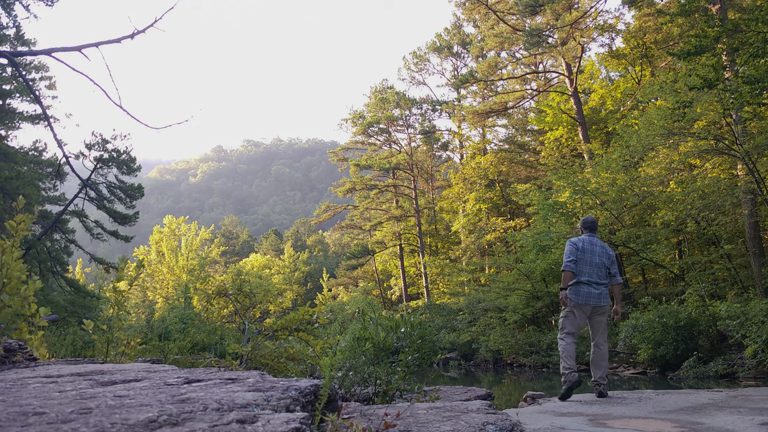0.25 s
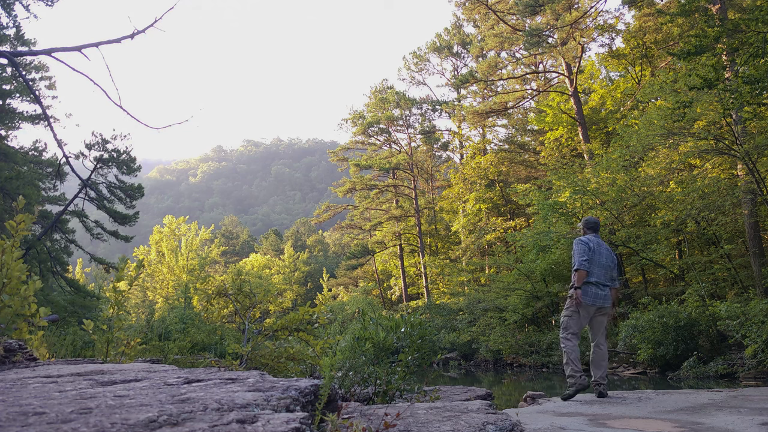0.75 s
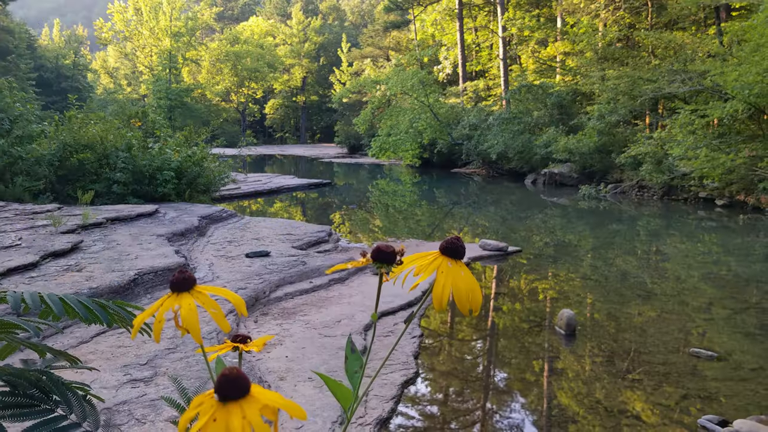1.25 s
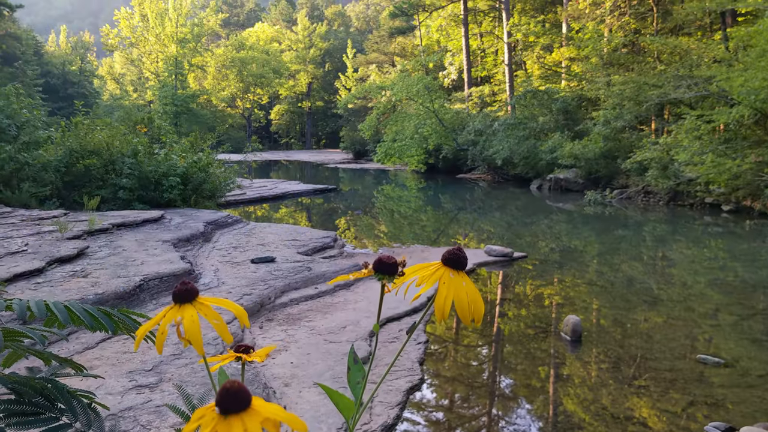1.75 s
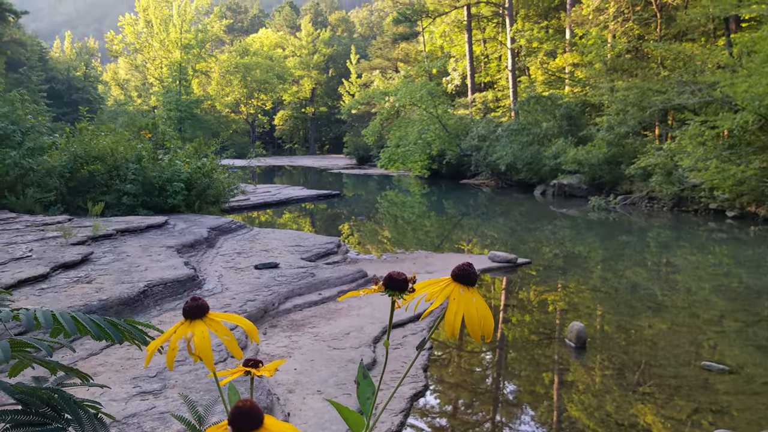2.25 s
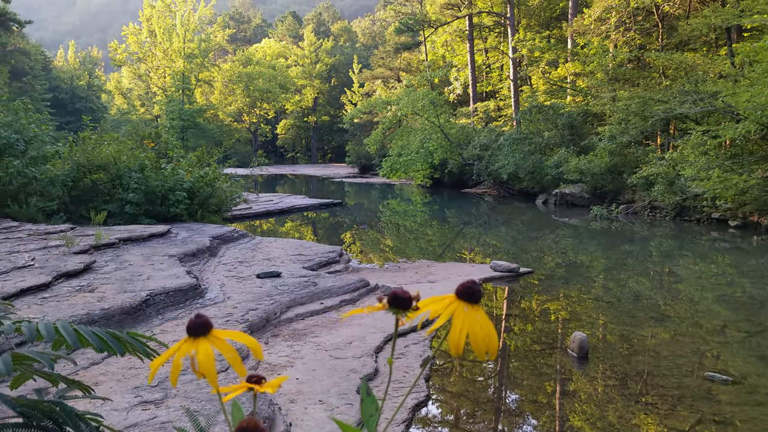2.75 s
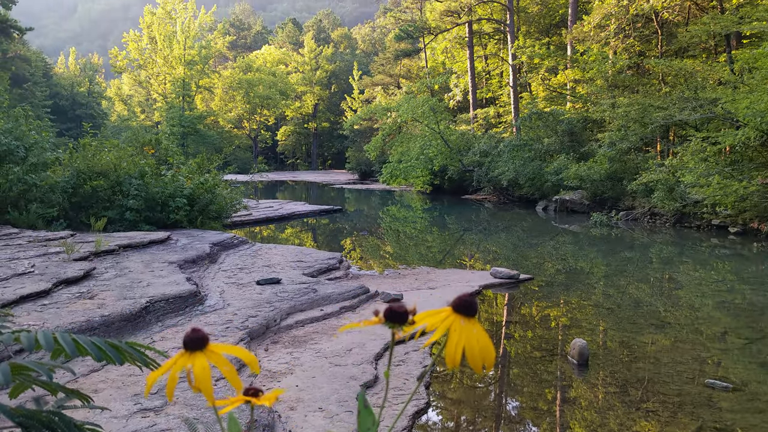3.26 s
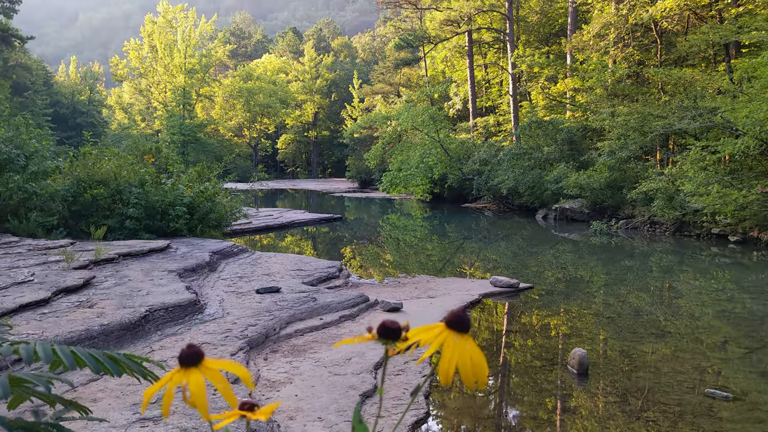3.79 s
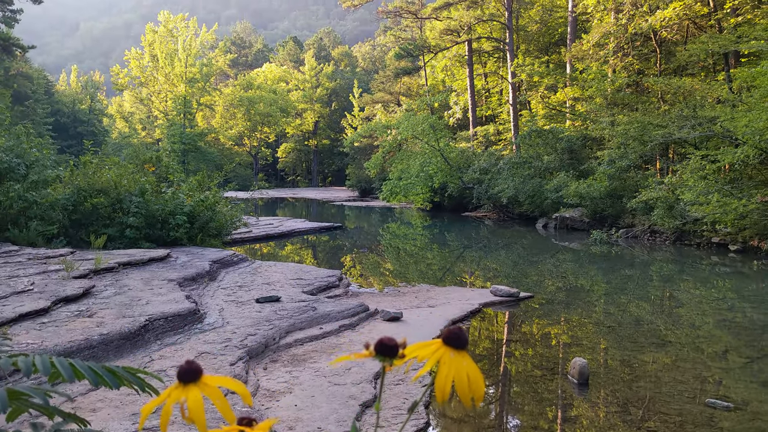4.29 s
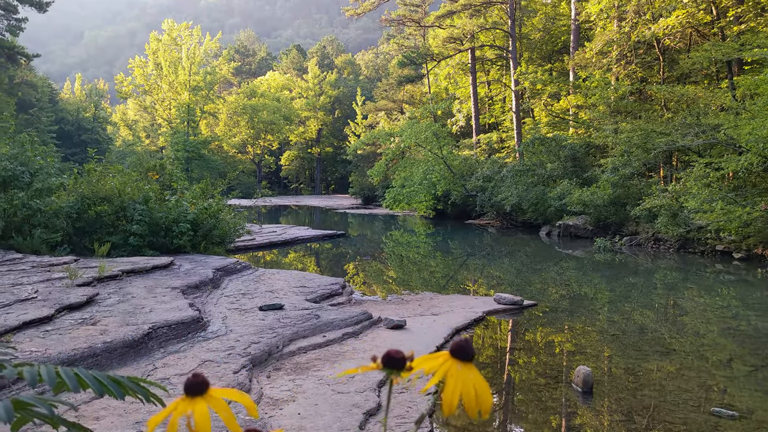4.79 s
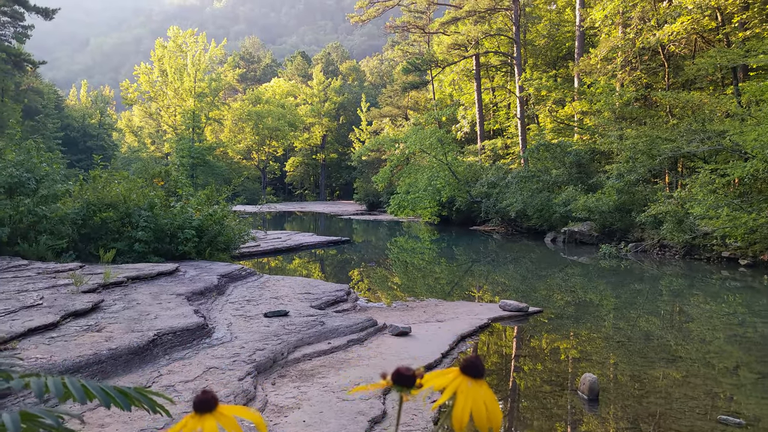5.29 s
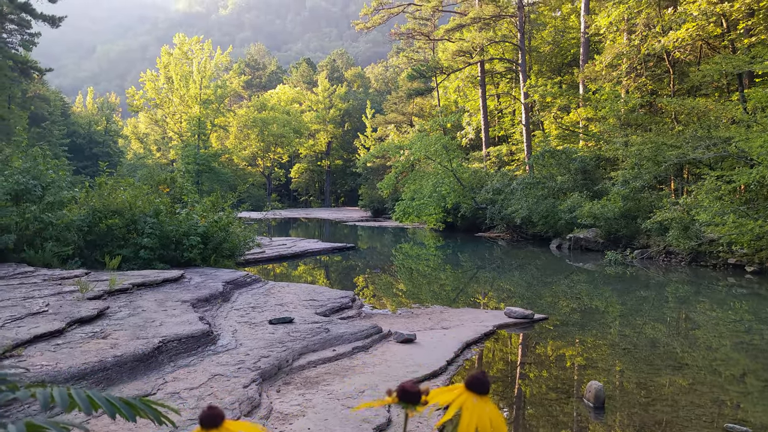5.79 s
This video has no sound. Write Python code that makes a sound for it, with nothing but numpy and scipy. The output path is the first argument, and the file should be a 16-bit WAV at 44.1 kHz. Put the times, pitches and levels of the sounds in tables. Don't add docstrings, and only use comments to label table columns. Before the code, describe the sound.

Dense high insect trilling outdoors, switching abruptly from far chorus to a close rasping cricket, with faint bird whistles, hollow taps and light wind puffs.

```python
import sys
import numpy as np
from scipy import signal
from scipy.fft import rfft, irfft, next_fast_len
from scipy.io import wavfile
from scipy.ndimage import uniform_filter1d

SR = 44100
rng = np.random.default_rng(int(sys.argv[2]) if len(sys.argv) > 2 else 0)


def level_to_linear(level):
    exponent = np.asarray(level, float) / 20
    return 10 ** exponent


def inscribe(sig):
    pcm = np.round(np.clip(np.atleast_2d(sig).T, -1, 1) * 32767)
    wavfile.write(sys.argv[1], SR, pcm.astype(np.int16))


N = 266364

SCENE_CHANGE_S = .9155
JOIN_DIP_S = .0012

# hz, left_db_per_hz, right_db_per_hz
RIDGE_AIR = [(30, -104, -104), (200, -104, -104), (730, -102, -103), (1740, -105, -105), (3330, -101, -103),
             (3880, -107, -107), (6860, -99, -100), (7450, -108, -107), (10200, -114, -114),
             (11400, -109, -112), (13200, -108, -117), (14900, -108, -123), (15700, -104, -119)]
CREEK_AIR = [(31, -108, -108), (160, -101, -99), (393, -99, -103.5), (900, -101, -100.5),
             (2130, -105, -106), (3200, -101, -104), (4050, -104, -105), (6500, -112, -87.5),
             (8310, -108, -108), (9930, -114, -116), (13000, -110, -118), (14000, -107, -121),
             (15500, -105, -119)]
# hz, likeness_0_to_1
AIR_LIKENESS = [(60, 0.18), (200, 0.028), (400, 0.52), (1500, 0.15), (3000, 0.018), (8000, 0.017)]

RIDGE_BREEZE_DB, CREEK_BREEZE_DB, FRESHEN_DB_PER_S = -64.5, -86.5, 2
# start_s (centre), peak_db, half_length_s
GUSTS = [
    (0, -63, 0.057),
    (0.507, -62, 0.022),
    (2.9, -75, .1),
    (3.797, -79, 0.082),
    (4.31, -68, 0.037),
    (4.58, -68, 0.076),
    (4.9, -74, 0.16),
    (5.4, -78, 0.29),
    (5.847, -72, 0.044),
    (6.02, -69, 0.046),
]
# start_s, length_s, low_hz, top_hz, level_db
PORT_HUM = (5.13, .6, 72, 116, -73)

# low_hz, high_hz, strokes_per_s, left_db, right_db, octave_left_db, octave_right_db
RIDGE_CHOIRS = [
    (5500, 6140, 32, -56.5, -52.5, -84, -71.5),
    (5780, 5990, 29.2, -58.5, -49.5, -91, -75),
    (6280, 7300, 38, -71, -76, -100, -100),
    (4440, 8000, 24, -67, -70, -110, -110),
]
CREEK_CHOIRS = [
    (5670, 5900, 30.5, -65.5, -50, -80, -86),
    (5954, 7450, 40, -61, -61.5, -100, -100),
    (7800, 3200, 48, -95, -105.5, -110, -110),
]
SOLOISTS = (7600, 7801.5, 56, -67.5, -64, -110, -110)

# start_s, length_s, from_hz, to_hz, level_db
BIRD_AHEAD = [(.255, .025, 2900, 3270, -73), (.45, .025, 2500, 2480, -73),
              (0.517, 0.035, 3350, 3290, -71.5), (0.862, 0.027, 2920, 2610, -71),
              (1.145, 0.042, 3280, 2780, -71), (1.186, 0.03, 3100, 3660, -69),
              (1.213, .03, 2850, 3020, -73), (1.327, .02, 3250, 3430, -71), (1.41, .06, 3100, 3140, -79),
              (1.48, .07, 3130, 2990, -79), (1.6, .04, 2700, 2940, -71), (1.701, .035, 2900, 2920, -72),
              (4.217, 0.0066, 9300, 8360, -67), (5.97, 0.036, 3620, 3690, -72)]
BIRD_LEFT = [
    (3.355, 0.028, 2650, 2650, -73.5),
    (3.29, .04, 2900, 2800, -79),
    (3.41, 0.027, 2700, 2650, -79),
    (3.665, 0.026, 3520, 3780, -77),
    (3.83, 0.028, 3480, 3710, -66.5),
    (3.9, 0.038, 2280, 2720, -80),
]
BIRD_RIGHT = [
    (3.685, .02, 4050, 4500, -75),
    (3.725, .02, 4400, 4150, -73),
]
PERCHES = (.1, 11, -4)
# start_s, pitch_hz, level_db
CLEAR_WHISTLE = [
    (.975, 3020, -78),
    (1.005, 2900, -72),
    (1.016, 3100, -69),
    (1.025, 3700, -63),
    (1.04, 4500, -66),
    (1.05, 4700, -76),
    (1.059, 4300, -68),
    (1.068, 3900, -67),
    (1.095, 3450, -69),
]
# start_s, length_s, start_hz, fall_hz, bend, peak_db, left_minus_right_db
CHIP = (.628, .03, 8900, 1850, 2.7, -44.5, 1.5)

# start_s, peak_db, ring_hz, left_minus_right_db
KNOCKS = [(0.908, -57, 371, -11), (1, -56, 397, -13), (1.263, -62.5, 395, -36), (1.294, -62.5, 330, -29),
          (1.703, -60.5, 398, -17), (1.753, -55.5, 325, -23), (1.797, -62, 301, -21),
          (1.923, -44, 428, -15), (2.393, -51.5, 382, -25), (2.812, -56, 365, -28), (3.017, -49, 394, -23),
          (4.462, -49.5, 370, -25.5), (4.541, -51.5, 370, -27), (4.564, -56, 437, -27),
          (4.574, -52.5, 382, -20), (5.002, -50, 364, -29)]
CLICK_DB, THUD_DB = -8, -19
# start_s (centre), peak_db, pitch_hz, left_minus_right_db
TICK = (1.9239, -38, 1050, -13)

# share_of_cycle, pitch_fall_hz, fall_bend, low_start_hz, pitch_scatter_hz, level_scatter_db
STROKE = (.537, 551, 2.97, 475, 18, 1.0)
WING_SAG = (535, 210, 900)
# left_db, right_db
NEAR_TONES = [
    (-54, -42.5),
    (-77, -88),
    (-65.5, -87),
]
MATE_TONES = [
    (-63, -55.5),
    (-79, -77),
    (-95, -99),
]
# delay_ms, level_db, phase_turns
NEAR_PATHS = [
    [(0, 0, 0), (1.3, -12.3, .77), (4.94, -11, .44)],
    [(0, 0, 0), (3.87, -9.5, .145), (6.1, -15, .91)],
]

MATE_RATE, MATE_HZ = 31.6, 5770
MATE_LAG, MATE_SWAY, MATE_SWAY_S = -.55, 0.118, 1.55
NEAR_RATE, NEAR_HZ, NEAR_EFFORT_DB = 31.1, 5632, 0.43
NEAR_LAG, NEAR_SLOW, NEAR_STEADY_S = .6, .18, 1.95
NEAR_PULL, NEAR_PULL_S = .016, 3.3

TREBLE_EDGE_HZ = 15765
# hz, dip_db
BAND_GATES = [(1000, -7), (1800, -3.8), (4300, -3.8), (5000, -28), (7700, -14), (8300, -2.8), (10500, -1.8),
              (11300, -9), (12200, -2.6), (13000, -4.5), (15000, -4)]


def evened(x):
    return x / np.sqrt(np.mean(x ** 2, axis=-1, keepdims=True) + 1e-20)


def add(mix, start_s, sound, side_db):
    part = mix[:, round(start_s * SR):][:, :len(sound)]
    part += level_to_linear([[side_db / 2], [-side_db / 2]]) * sound[:part.shape[1]]


def band(x, lo_hz, hi_hz):
    return signal.sosfilt(signal.butter(2, [lo_hz, hi_hz], "band", fs=SR, output="sos"), x)


def woods(x, t60, wet_db):
    t = np.arange(SR // 2) / SR
    tail = rng.standard_normal((2, len(t))) * level_to_linear(-60 * t / t60) * (t > .004)
    tail = tail / np.linalg.norm(tail[0])
    return x + level_to_linear(wet_db) * signal.fftconvolve(x, tail, axes=1)[:, :x.shape[1]]


def air(colour, size):
    frames, hz = size // 256 + 5, np.fft.rfftfreq(1024, 1 / SR)
    a, b, c, d, patches = rng.standard_normal((frames, 513, 5)).T
    patches = evened(uniform_filter1d(uniform_filter1d(patches, 10, 0), 12, 1))
    same = np.clip(np.interp(hz, *np.transpose(AIR_LIKENESS)), 0, 1)[:, None]
    left_noise = a + 1j * b
    right_noise = same * left_noise + np.sqrt(1 - same ** 2) * (c + 1j * d)
    f, left, right = np.transpose(colour)
    db = np.array([np.interp(np.log(hz + 1), np.log(f), side) for side in (left, right)])
    z = np.array([left_noise, right_noise]) * level_to_linear(db[:, :, None] + 1.26 * patches + 18.0)
    return signal.istft(z, nperseg=1024, noverlap=768)[1][:, :size]


def breeze(t):
    common, left, right, lumps = rng.standard_normal((4, N))
    push = band(band(common + 0.63 * np.array([left, right]), 50, 110.5), 45, 170)
    push = push * level_to_linear(3.4 * evened(band(lumps, 2.8, 27)))
    steady = level_to_linear(np.where(t < SCENE_CHANGE_S, RIDGE_BREEZE_DB, CREEK_BREEZE_DB + FRESHEN_DB_PER_S * t))
    gusts = sum(level_to_linear(db) * np.exp(-((t - s) / half) ** 2) for s, db, half in GUSTS)
    return evened(push) * (steady + gusts) * level_to_linear(-8.0)


def port_hum():
    out = np.zeros((2, N))
    start_s, length_s, lo_hz, top_hz, db = PORT_HUM
    arch = np.sin(np.pi * np.arange(0, 1, 1 / SR / length_s) ** 1.2) ** .6
    pitch_waver, level_waver = evened(band(rng.standard_normal((2, len(arch))), 5, 22))
    hz = lo_hz + (top_hz - lo_hz) * arch + 4.0 * pitch_waver
    hum = np.sin(2 * np.pi * np.cumsum(hz) / SR)
    add(out, start_s, level_to_linear(db + 3.0 * level_waver) * arch * hum, -1.5)
    return out


def strokes(turns, top_hz, share, fall_hz, bend, start_hz, scatter_hz, scatter_db):
    number = (turns - turns[0] // 1).astype(int)
    detune, strength = rng.standard_normal((400, 2))[number].T
    u = np.minimum(turns % 1 / share, 1)
    sag = fall_hz * u ** bend + start_hz * np.exp(-u / .05)
    size = np.minimum(u / .16, 1) * np.minimum((1 - u) / .1, 1) * (1 + u)
    size = size * level_to_linear(scatter_db * strength)
    phase = 2 * np.pi * np.cumsum(top_hz - sag + scatter_hz * detune) / SR
    return size, phase, sag


def choir(t, lo_hz, hi_hz, rate, left_db, right_db, high_left_db, high_right_db, count=8):
    low, high = np.zeros((2, 2, len(t)))
    scatter_hz = .8 * (hi_hz - lo_hz) / count
    for k, (beat, lag, place, swell) in enumerate(rng.random((count, 4))):
        hz = lo_hz + (hi_hz - lo_hz) * (k + .5) / count
        turns = rate * (.94 + .12 * beat) * t + lag
        size, phase, sag = strokes(turns, hz, .6, .05 * hz, 2.2, 99.5, scatter_hz, 1.06)
        size = size * level_to_linear(3.3 * np.sin(2 * np.pi * (swell + (0.19 + 0.705 * lag) * t)))
        low += [[place + 0.12], [1.3 - place]] * (size * np.cos(phase))
        high += size * np.exp(-(sag / WING_SAG[1]) ** 2) * np.cos(2 * phase)
    octave = level_to_linear([[high_left_db], [high_right_db]]) * evened(high)
    return level_to_linear([[left_db], [right_db]]) * evened(low) + octave


def whistle(hz, db):
    return level_to_linear(db) * np.sin(2 * np.pi * np.cumsum(hz) / SR) * signal.windows.tukey(len(hz), .25)


def chip():
    start_s, length_s, hz, fall_hz, bend, db, side_db = CHIP
    u = np.arange(0, 1, 1 / SR / length_s)
    swell_db = np.where(u < .63, -47 * (.63 - u), -62 * (u - .63))
    return start_s, whistle(hz - fall_hz * u ** bend, db + swell_db), side_db


def birds():
    out = np.zeros((2, N))
    flutter = level_to_linear(1.5 + 2.0 * evened(band(rng.standard_normal(N), 15, 60)))
    for notes, side_db in zip((BIRD_AHEAD, BIRD_LEFT, BIRD_RIGHT), PERCHES):
        for start_s, length_s, from_hz, to_hz, db in notes:
            glide = np.linspace(from_hz, to_hz, round(length_s * SR))
            add(out, start_s, whistle(glide, db), side_db)
    knot_s, knot_hz, knot_db = np.transpose(CLEAR_WHISTLE)
    t = np.arange(knot_s[0], knot_s[-1], 1 / SR)
    hz, db = np.interp(t, knot_s, knot_hz), np.interp(t, knot_s, knot_db)
    add(out, t[0], whistle(uniform_filter1d(hz, size=120), db), PERCHES[0])
    out = out * flutter
    add(out, *chip())
    return woods(out, 0.7, -3.5)


def knocks():
    out, t = np.zeros((2, N)), np.arange(SR // 10) / SR
    click = level_to_linear(CLICK_DB) * np.sin(2 * np.pi * 1000 * t) * np.exp(-t / 0.00069)
    thud_turns = np.cumsum(115 + 170 * np.exp(-t / .011)) / SR
    thud = level_to_linear(THUD_DB) * np.sin(2 * np.pi * thud_turns) * np.exp(-((t - .017) / .012) ** 2)
    for start_s, db, hz, side_db in KNOCKS:
        turns = np.cumsum(hz * (0.57 + 1.0 * np.exp(-t / 0.0032))) / SR
        ring = np.sin(2 * np.pi * turns) * t / 0.0018 * np.exp(1 - t / 0.0017)
        add(out, start_s + 0.0021, level_to_linear(db - 6.0) * (ring + click + thud), 0.98 * side_db)
    return out


def shell_tick():
    out, t = np.zeros((2, N)), np.arange(-200, 200) / SR
    centre_s, db, hz, side_db = TICK
    tick = np.cos(2 * np.pi * hz * t) + 0.22 * np.cos(2 * np.pi * 2300 * t)
    add(out, centre_s + t[0], -level_to_linear(db - 5.5) * tick * np.exp(-(t / .0007) ** 2), side_db)
    return out


def cricket(t, rate, lag, top_hz, tones):
    size, phase, sag = strokes(rate * t + 0.024 + lag, top_hz, *STROKE)
    out = np.zeros((2, len(t)))
    for k, (db, sag_hz) in enumerate(zip(tones, WING_SAG)):
        tone = size * np.exp(-(sag / sag_hz) ** 2) * np.cos((k + 1) * phase)
        out += level_to_linear(db)[:, None] * evened(tone)
    return out


def mate_cricket(t):
    lag = MATE_LAG + MATE_SWAY * np.cos(2 * np.pi * (t - 2.25) / MATE_SWAY_S)
    return cricket(t, MATE_RATE, lag, MATE_HZ, MATE_TONES)


def bounce(x):
    size = next_fast_len(x.shape[1])
    hz = np.fft.rfftfreq(size, 1 / SR)
    comb = np.zeros((2, len(hz)), complex)
    for side, paths in enumerate(NEAR_PATHS):
        for ms, db, turns in paths:
            comb[side] += level_to_linear(db) * np.exp(2j * np.pi * (turns - (hz - NEAR_HZ) * ms / 1000))
    return irfft(rfft(x, size) * comb, size)[:, :x.shape[1]]


def near_cricket(t):
    lag = NEAR_LAG + NEAR_SLOW * np.maximum(NEAR_STEADY_S - t, 0)
    lag = lag - NEAR_PULL * np.cos(2 * np.pi * (MATE_RATE - NEAR_RATE) * (t - NEAR_PULL_S))
    return bounce(cricket(t, NEAR_RATE, lag, NEAR_HZ, NEAR_TONES)) * level_to_linear(NEAR_EFFORT_DB)


def scene():
    t, cut, lead = np.arange(N) / SR, round(SCENE_CHANGE_S * SR), SR // 4
    early, late = t[:cut], t[cut - lead:]
    ridge = woods(sum(choir(early, *row, count=12) for row in RIDGE_CHOIRS), .3, -2)
    ridge = ridge + air(RIDGE_AIR, cut)
    close = near_cricket(late) + mate_cricket(late) + choir(late, *SOLOISTS, count=2)
    far = sum(choir(late, *row) for row in CREEK_CHOIRS)
    creek = woods(close, 0.25, -17) + woods(far, 0.89, -1.67) + air(CREEK_AIR, len(late))
    insects = np.hstack([ridge, creek[:, lead:]])
    insects = insects * np.clip(abs(t - cut / SR) / JOIN_DIP_S, .15, 1)
    spaced = np.array([insects[0], np.roll(insects[1], shift=4)])
    return spaced + breeze(t) + knocks() + shell_tick() + birds() + port_hum()


def gated_bands(x):
    hz, _, z = signal.stft(x, SR, nperseg=2048, noverlap=1024, window="cosine")
    bands = z[:, :1024].reshape(2, 128, 8, -1)
    power_db = 10 * np.log10((abs(bands) ** 2).mean(2) + 1e-30)
    dip_db = power_db - np.median(power_db, axis=-1, keepdims=True)
    gate_db = np.interp(hz[4:1024:8], *np.transpose(BAND_GATES))[:, None]
    keep = dip_db.mean(0, keepdims=True) > gate_db
    gated = (bands * keep[:, :, None]).reshape(2, 1024, -1)
    z = np.concatenate([gated, z[:, 1024:]], axis=1)
    return signal.istft(z, SR, nperseg=2048, noverlap=1024, window="cosine")[1][:, :N]


def top_cut(x):
    return signal.sosfilt(signal.butter(12, 16850, fs=SR, output="sos"), x)


def record(dry):
    edge = signal.firwin(2401, TREBLE_EDGE_HZ, window=("kaiser", 8), fs=SR)
    mix = gated_bands(signal.oaconvolve(dry, edge[None], "same"))
    return top_cut(mix)


dry = scene()
out = record(dry)
inscribe(out)
```